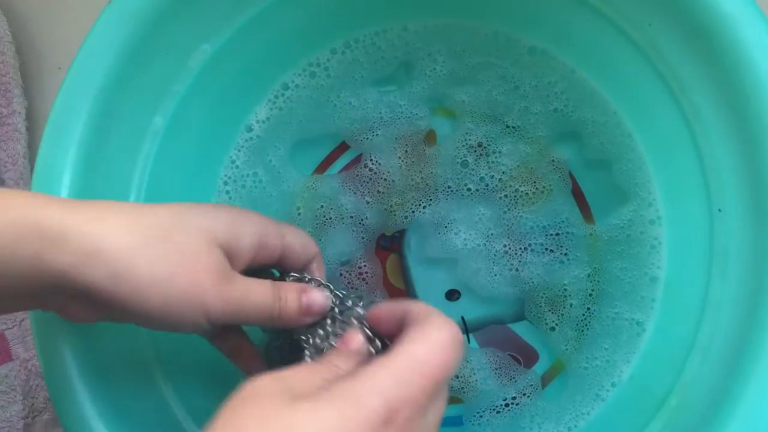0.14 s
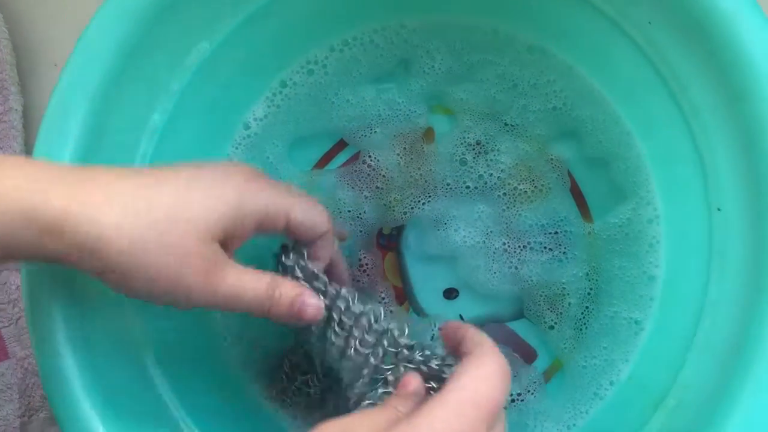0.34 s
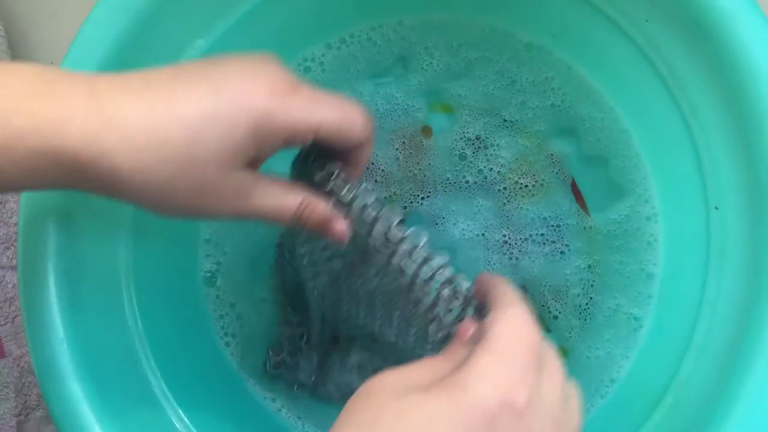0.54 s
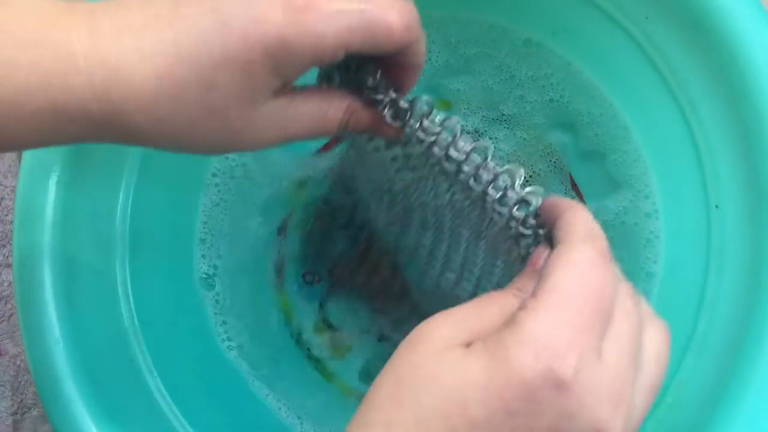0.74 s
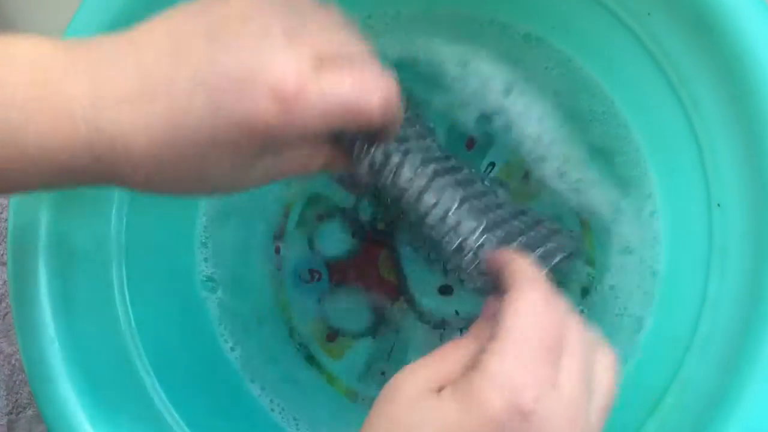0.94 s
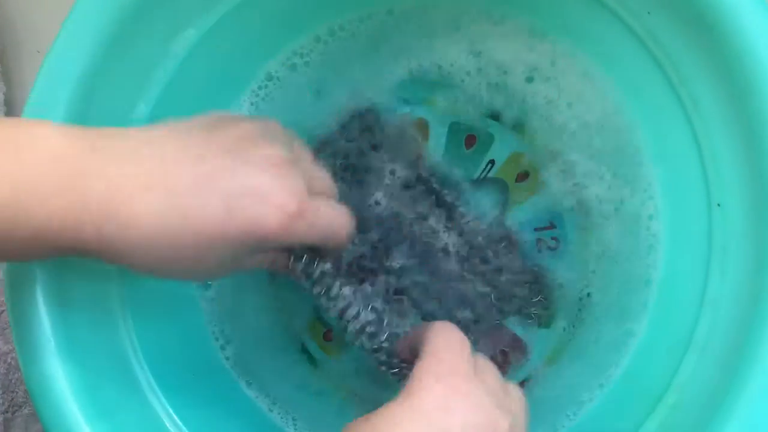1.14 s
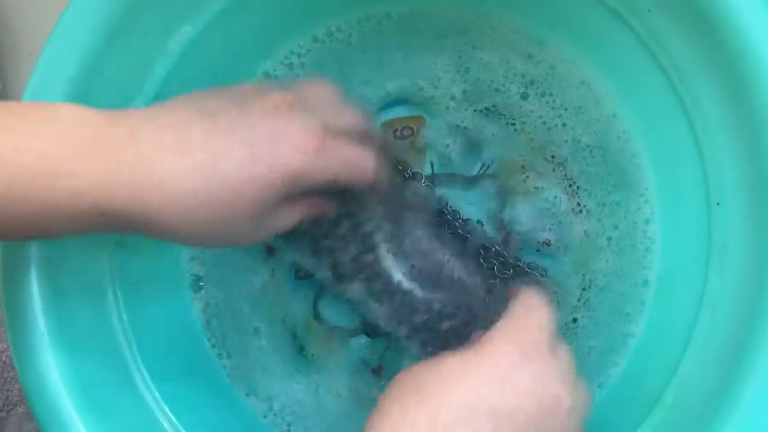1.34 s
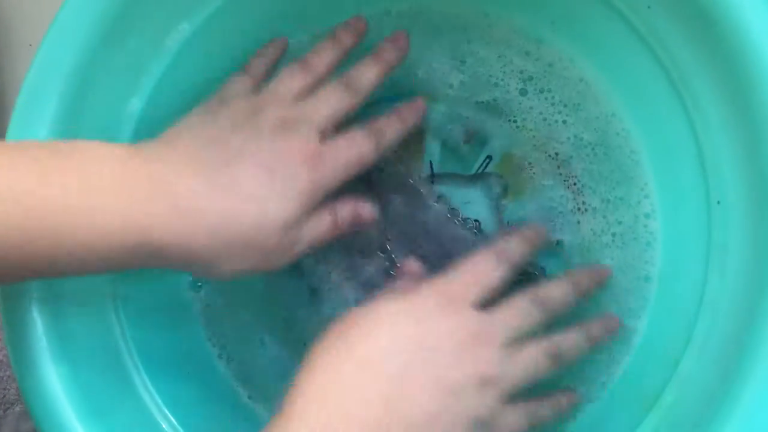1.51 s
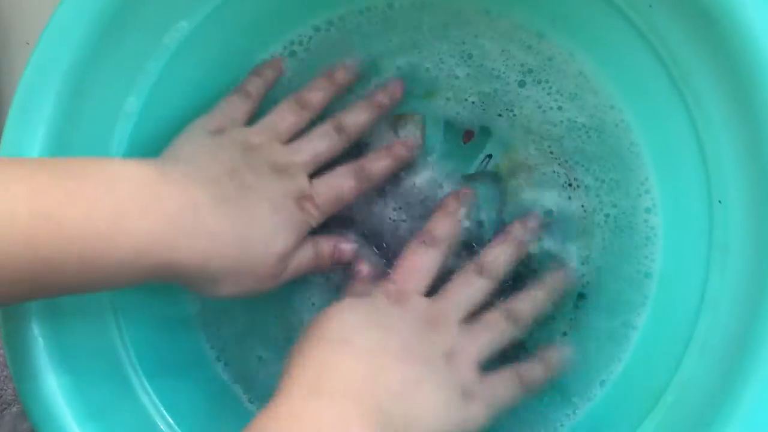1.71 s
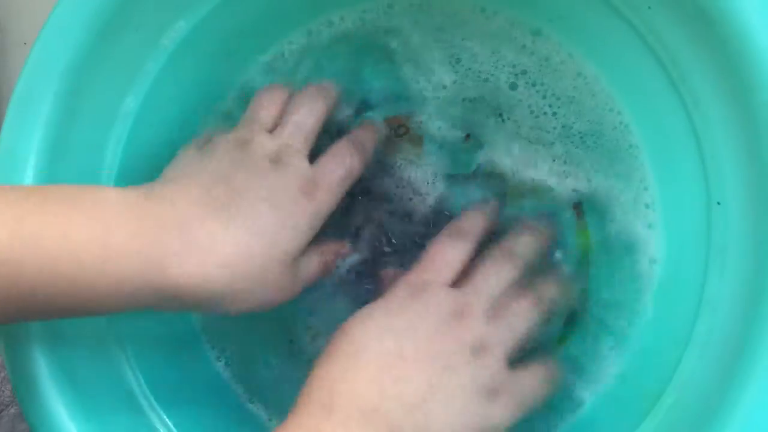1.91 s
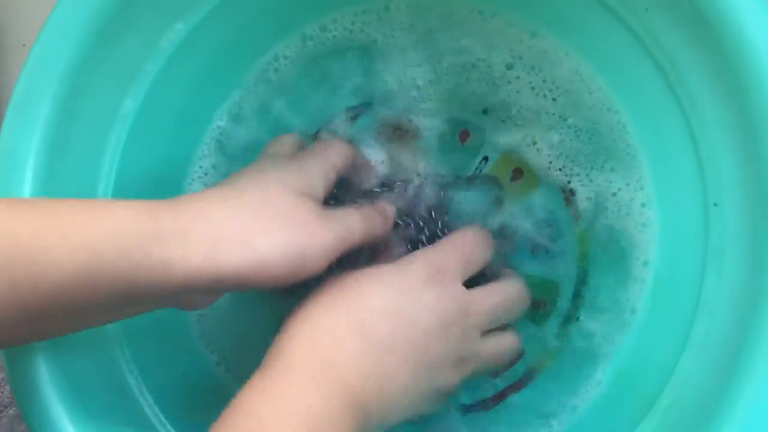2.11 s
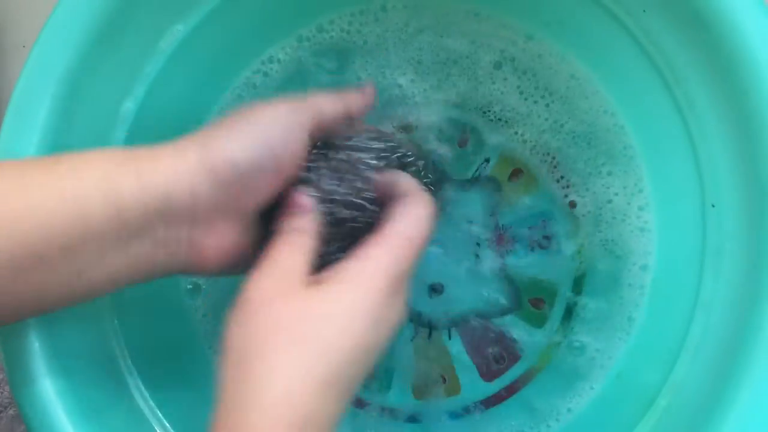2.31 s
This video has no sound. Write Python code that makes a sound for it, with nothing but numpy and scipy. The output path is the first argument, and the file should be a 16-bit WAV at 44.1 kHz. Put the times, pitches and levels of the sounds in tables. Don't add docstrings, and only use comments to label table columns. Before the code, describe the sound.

Steel chainmail handled in a plastic basin of soapy water, heard close in a small quiet room. Faint jingling, then a loud hollow clatter at 0.2 seconds with tiny bubble pops until about 0.35. Light ticking and dragging follow, with grating scrapes around 0.85-1.2. From 1.4 to 2.3, short scrubbing strokes crunch and tick over low watery thumps and gulps, with fine jingling near the end.

```python
import sys
import numpy as np
from scipy import signal
from scipy.io import wavfile
from scipy.ndimage import uniform_filter1d

SR = 44100
rng = np.random.default_rng(int(sys.argv[2]) if len(sys.argv) > 2 else 0)


def store_pcm(level_fs):
    pcm = np.round(np.clip(level_fs, -1, 1) * 32767).astype(np.int16)
    wavfile.write(sys.argv[1], SR, np.atleast_2d(pcm).T)


def nominal_scale(level):
    x = np.asarray(level, float) / 20
    return 10 ** x


N = 103635


def evened(x):
    return x / np.sqrt(np.mean(x ** 2) + 1e-20)


def read(points, hz):
    f, value = np.transpose(points)
    return np.interp(np.log(hz + 1), np.log(f + 1), value)


def curve(rows, column=1):
    rows = np.array(rows)
    return np.interp(np.arange(N) / SR, rows[:, 0], rows[:, column])


def add_at(out, time_s, x):
    i = round(time_s * SR)
    out[i:][:len(x)] += x[:N - i]


def highpass(x, order, hz):
    return signal.sosfilt(signal.butter(order, hz, "high", fs=SR, output="sos"), x)


def colour(x, points):
    log_gain = np.log(nominal_scale(read(points, abs(np.fft.fftfreq(4096, 1 / SR)))))
    fir = np.fft.ifft(np.exp(np.conj(signal.hilbert(log_gain)))).real[:2048]
    return signal.oaconvolve(x, fir / np.linalg.norm(fir))[:N]


def ring(x, modes, detune=0.):
    t = np.arange(6000) / SR
    response = np.zeros(len(t))
    for hz, width_hz, db in modes:
        mode_hz = hz * (1 + detune * rng.standard_normal())
        decay = nominal_scale(db) * np.sqrt(width_hz) * np.exp(-np.pi * width_hz * t)
        response += decay * np.sin(2 * np.pi * mode_hz * t) * rng.choice([-1, 1])
    return signal.oaconvolve(x, response / np.linalg.norm(response))[:N]


def taps(per_s, spread_db, clump_db):
    size = nominal_scale(spread_db * np.minimum(rng.exponential(1, N), 3.3))
    size = size * (rng.random(N) < per_s / SR)
    slow = uniform_filter1d(rng.standard_normal(N), size=130)
    clumps = evened(uniform_filter1d(slow, size=130))
    return evened(size * rng.choice([-1., 1.], N) * nominal_scale(clump_db * clumps))


def hush():
    # (frequency [Hz], density [dB per Hz])
    floor = [(40, -13), (100, -9), (250, -16), (600, -18.5), (1700, -22), (6000, -26), (16000, -55)]
    return nominal_scale(-70.5) * colour(rng.standard_normal(N), floor)


def thumps():
    # (time [s], level [dB])
    push = [(0, -73), (.1, -81), (.13, -78), (.17, -83), (.22, -62), (.25, -54), (.45, -72.5), (.96, -63.5),
            (1.3, -63.5), (1.44, -66), (1.48, -56), (1.62, -75), (1.73, -62), (1.79, -68), (1.85, -51.5),
            (2.0, -60), (2.1, -49.5), (2.35, -70)]
    # (frequency [Hz], width [Hz], level [dB])
    boom = [(71, 31, -3), (100.5, 9.4, 2.5), (127.5, 56, -1), (176, 16, -8.5), (209.5, 9.7, -7),
            (294, 27, -22)]
    bump_s, bump_length_s, bump_hz, bump_db = 0.088, 0.084, 72, -55.5
    lumps = nominal_scale(0.53 * evened(uniform_filter1d(rng.standard_normal(N), size=1500)))
    pressure = evened(rng.standard_normal(N) * lumps) * nominal_scale(curve(push))
    t = np.arange(N) / SR - bump_s
    swell = np.sin(np.pi * np.clip(t / bump_length_s, 0, 1)) ** 2
    bump = nominal_scale(bump_db) * swell * np.sin(2 * np.pi * bump_hz * t)
    return ring(pressure, boom) + bump


def jingle():
    # (time [s], level [dB])
    loose = [(0, -81), (.05, -68), (.11, -64.5), (.13, -56.5), (.21, -56.5), (.3, -87), (1.2, -79),
             (1.33, -98), (1.46, -55), (1.6, -86), (1.85, -62), (2.2, -49.5), (2.35, -54)]
    # (frequency [Hz], width [Hz], level [dB])
    ring_modes = [(11260, 280, 5.5), (11700, 310, 1.5), (5250, 330, -2), (6170, 220, 0), (3580, 600, -7)]
    # (frequency [Hz], density [dB per Hz])
    hiss = [(600, -32), (2000, -6.5), (5000, -4.5), (8500, -5), (10300, -6), (12000, -2.5), (16000, -5)]
    wet_db, wet_from_s, hiss_db = -10, 1, 4
    level = nominal_scale(curve(loose))
    touches = taps(2500, 3, 2.5) * level
    wet = nominal_scale(wet_db * (np.arange(N) > wet_from_s * SR))
    return ring(touches * wet, ring_modes) + nominal_scale(hiss_db) * colour(taps(7700, 2.5, 1.4) * level, hiss)


def bubbles():
    # (time [s], peak [dB], pitch [Hz], t60 [s])
    pops = [
        (0.203, -40, 5200, 0.015),
        (0.271, -14, 5250, 0.012),
        (0.35, -26, 4450, 0.011),
        (0.34, -19.5, 4450, 0.0081),
        (.737, -33, 6800, 0.017),
        (0.657, -35, 6100, 0.028),
        (.192, -46, 6550, 0.0071),
    ]
    swell_s = 0.0048
    out, t = np.zeros(N), np.arange(2000) / SR
    for time_s, db, hz, t60_s in pops:
        swell = np.sin(np.pi / 2 * np.minimum(t / swell_s, 1)) ** 2
        pop = swell * nominal_scale(db + 9.0 - 60 * (t / t60_s) ** 0.97)
        add_at(out, time_s, pop * np.sin(2 * np.pi * hz * (t + 1.2 * t ** 2)))
    return out


def contact():
    # (time [s], level [dB], brightness [dB])
    drag = [(.21, -93, 0), (.3, -39.5, -2), (.43, -48, 0.5), (.59, -42.5, 1), (.8, -35.5, 0),
            (.91, -39.5, -2), (1.1, -41, -1), (1.285, -40.5, -5), (1.308, -45, -30), (1.345, -48.5, -26),
            (1.4, -50, 9), (1.5, -50.5, 14.5), (1.6, -71, -5), (1.75, -52, 5), (1.9, -40.5, -29),
            (2.02, -39, 3), (2.21, -34, -3.5), (2.35, -42, 17)]
    # (start [s], length [s], level [dB], peak place [0-1], brightness [dB])
    strokes = [(0.216, 0.0052, -24.5, 0.73, 0), (0.223, 0.046, -22, 0.46, 6.5), (0.261, 0.046, -31, 0, 6.5),
               (0.289, 0.045, -36, 0.1, 3.5), (0.833, 0.021, -28.5, 0.46, -1.5),
               (.855, 0.012, -49, 0.2, 10), (0.9, 0.16, -35.5, 0.5, 2.5), (0.965, 0.11, -28.5, 0.57, 3),
               (1.154, 0.036, -33, 0.38, 1.5), (1.208, 0.064, -41.5, 0.2, 0.5),
               (1.385, 0.025, -38, 0.42, 5.5), (1.4, 0.056, -37, 0.86, 4.5), (1.453, 0.048, -27, 0.46, 5),
               (1.678, 0.06, -29.5, 0.62, 0), (1.802, 0.068, -42, 0.31, 4), (1.826, 0.068, -29, 0.64, 3.5),
               (1.922, 0.067, -37, 0.31, 4), (2.032, 0.081, -31.5, 0.33, -0.5),
               (2.097, 0.081, -27.5, 0.8, 1)]
    rise_db, fall_db, edge_s = -10, -10, 0.005
    start_share = 0.37
    t = np.arange(N) / SR
    parts = [(nominal_scale(curve(drag)), curve(drag, column=2))]
    for start, length, db, peak, bright_db in strokes:
        top, end = start + length * np.clip(peak, .05, .95), start + length
        closed = start + start_share * (top - start)
        gate = np.interp(t, [start, closed, end, end + edge_s], [0, 1, 1, 0])
        swell_db = np.interp(t, [start, top, end], [rise_db * peak, 0, fall_db * (1 - peak)])
        parts.append((gate * nominal_scale(db + swell_db), bright_db))
    level = np.sqrt(sum(g ** 2 for g, _ in parts))
    bright = np.sqrt(sum((g * nominal_scale(b)) ** 2 for g, b in parts))
    return level, bright


def knocks():
    # (time [s], peak [dB], brightness [dB])
    hits = [(0.2164, -23, 12.5), (0.228, -12, -6), (0.236, -6.5, -10), (0.243, -7, 3.5), (0.367, -35, -1),
            (0.389, -32, 3.5), (0.445, -30.5, 5), (0.464, -26.5, -10), (0.499, -25.5, 3.5), (0.748, -25, 5),
            (0.822, -31, 6), (0.841, -23, 3), (0.858, -26, 14.5), (0.973, -21.5, 9), (1.034, -18, -10),
            (1.351, -34.5, 6.5), (1.367, -34.5, 13), (1.39, -28, 5), (1.421, -32, -3), (1.695, -22.5, -5),
            (1.874, -20, -4), (1.959, -23.5, -5), (2.04, -31, -8), (2.111, -16, -1), (2.287, -35, 17)]
    knock_s, knock_db = 0.0017, -8
    body, bright, u = np.zeros(N), np.zeros(N), np.arange(600) / SR / knock_s
    swell = 1.72 * u ** 0.33 * np.exp(-u / 1.47)
    for time_s, db, bright_db in hits:
        shape = nominal_scale(db + knock_db) * swell * rng.standard_normal((2, 600))
        add_at(body, time_s, shape[0])
        add_at(bright, time_s, nominal_scale(bright_db) * shape[1])
    return body, bright


def mail():
    # (frequency [Hz], width [Hz], level [dB])
    basin = [(360.8, 14, -12.5), (751, 60, -4.5), (874, 38, -5), (1216, 25, -5.5), (1425, 100, -4.5),
             (1601, 24, -1.5), (1717, 34, 3), (1967, 56, 0.5), (2110, 47, -1), (2242, 73, -3.5),
             (3220, 36, -6.5), (3460, 570, 2.5)]
    # (frequency [Hz], width [Hz], level [dB])
    hollow = [(1242, 160, -11.5), (1692, 164, 3.5), (2070, 160, -1.5), (3360, 280, -16)]
    # (time [s], level [dB])
    dry_wall = [(0, 10), (.3, -6), (1.1, -4), (1.3, -27), (2.35, -21)]
    # (frequency [Hz], density [dB per Hz])
    tap_body = [(150, -74.5), (330, -23.5), (750, -5.5), (1100, -6), (1800, -3.5), (2600, -9),
                (6000, -22.5), (16000, -49)]
    # (frequency [Hz], level [dB])
    tick = [(800, -24), (2500, 1.5), (4000, 3.5), (6200, 1), (7200, -4), (10300, -7.5), (11000, -6),
            (16000, -13)]
    modes_db, hollow_db, tick_db, wall_low_hz = -2, -1, -9.5, 330
    own_ticks = 0.76
    level, bright = contact()
    knock, knock_bright = knocks()
    clicks = taps(8000, 3, 2)
    ticks = evened(clicks * (1 - own_ticks) + own_ticks * taps(4000, 3.5, 1.7))
    drive = clicks * level + .4 * knock
    patch = rng.integers(0, 6, N)
    walls = nominal_scale(modes_db) * sum(ring(drive * (patch == k), basin, detune=.004) for k in range(3))
    hollow_drive = knock + nominal_scale(curve(dry_wall)) * level * taps(3000, 5.8, 3.0)
    walls = highpass(walls + nominal_scale(hollow_db) * ring(hollow_drive, hollow), 4, wall_low_hz)
    steel = nominal_scale(tick_db) * colour(ticks * bright + knock_bright, tick)
    return colour(drive * (patch > 2), tap_body) + walls + steel


def slaps():
    # (time [s], peak [dB])
    blows = [(0.2165, -19), (.2273, -16), (0.2354, -3.5), (0.2397, -8), (0.2429, -6.5), (.247, -10),
             (1.012, -17), (1.4212, -24), (1.7041, -21), (1.712, -20.5), (1.7196, -20)]
    # (frequency [Hz], width [Hz], level [dB])
    slap_modes = [(1696, 120, -2.5), (2030, 220, 1.5), (3500, 760, 1), (1220, 150, -11)]
    slap_db, slap_low_hz = -3.5, 800
    drive = np.zeros(N)
    for time_s, db in blows:
        add_at(drive, time_s, nominal_scale(db + slap_db) * np.hanning(13))
    return highpass(ring(drive, slap_modes), 3, slap_low_hz)


def gulps():
    # (time [s], peak [dB], pitch [Hz], length [s])
    swells = [(.235, -46, 139, 0.06), (.29, -49, 150, 0.052), (.575, -60, 94, 0.055),
              (.64, -57.5, 100, 0.06), (0.953, -52, 110, 0.071), (1.16, -54.5, 177, 0.056),
              (1.464, -46, 140, 0.045), (1.47, -49, 92, .06), (1.702, -54, 105, 0.046),
              (1.71, -50.5, 175, .06), (1.847, -47, 95, 0.082), (1.86, -51, 179, .04),
              (1.905, -50, 95, .05), (1.959, -50, 100, .045), (2.034, -44, 96.5, 0.068),
              (2.095, -45, 208, .04), (2.099, -45, 126, .04), (2.152, -47, 149, 0.036),
              (2.165, -47, 202, .04), (2.203, -55, 116, 0.079)]
    out = np.zeros(N)
    for time_s, db, hz, length_s in swells:
        t = np.arange(0, length_s, 1 / SR)
        swell = np.sin(np.pi * (t / length_s) ** 0.76) ** 2
        add_at(out, time_s, nominal_scale(db) * swell * np.sin(2 * np.pi * (hz * t + rng.random())))
    return out


def snaps():
    # (time [s], peak [dB], dullness [0-1])
    clicks = [(.4889, -41, 0.4), (.5487, -32, .5), (.659, -34, .2), (.672, -43, .3), (.715, -42, .3),
              (.7378, -38, .6), (.7912, -29, 0), (.815, -40, .1), (.8251, -31, 0.5), (.868, -35, .1),
              (.9209, -34, .2), (.943, -35, .3), (1.04, -26, .2), (1.063, -33, 0.3), (1.112, -46, .1),
              (1.2142, -30, 1), (1.266, -43, .1), (1.279, -43, .2), (1.378, -41, .7), (1.396, -40, .4),
              (1.4427, -37, 0.2), (1.451, -36, .1), (1.4631, -26, 0.6), (1.496, -25, .2), (1.8079, -41, .2),
              (1.8308, -31, 0.2), (1.9316, -40, .5), (1.9875, -31, .05), (2.174, -27, 0.1),
              (2.205, -35, .3), (2.34, -30, .2)]
    # (frequency [Hz], level [dB])
    thin_colour = [(3000, -30), (6500, -5), (9000, 3), (11000, -8), (16000, -3)]
    # (frequency [Hz], level [dB])
    dull_colour = [(800, -27), (2500, -2), (6300, -2), (8000, -8), (16000, -20)]
    snap_s, snap_db = 0.0016, -5
    thin, dull, u = np.zeros(N), np.zeros(N), np.arange(600) / SR / snap_s
    for time_s, db, dullness in clicks:
        burst = nominal_scale(db + snap_db) * np.minimum(u * 8, 1) * np.exp(-u) * rng.standard_normal(600)
        add_at(thin, time_s, (1 - dullness) * burst)
        add_at(dull, time_s, dullness * burst)
    return colour(thin, thin_colour) + colour(dull, dull_colour)


def tail():
    # (frequency [Hz], t60 [s])
    decay = [(250, 0.5), (1000, 0.3), (3000, 0.27), (8000, 0.23), (15000, 0.08)]
    spots = np.zeros(SR // 2)
    at = np.arange(200, SR // 2 - 20, 20)
    spots[at + rng.integers(0, 20, len(at))] = rng.choice([-1., 1.], len(at))
    hz, t, z = signal.stft(spots, SR, nperseg=256)
    echoes = signal.istft(z * nominal_scale(-60 * t / read(decay, hz)[:, None]), SR, nperseg=256)[1]
    return echoes / np.linalg.norm(echoes)


def room(x):
    turn = np.pi * 9 * np.arange(N) / SR
    out = np.zeros(N)
    for k in range(3):
        share = np.sqrt(2 / 3) * np.cos(turn + k * np.pi / 3)
        out += signal.fftconvolve(x * share, tail())[:N]
    return out


def scene():
    room_db = -12
    low = thumps() + gulps()
    near = jingle() + mail() + slaps() + snaps()
    pops = bubbles()
    answer = nominal_scale(room_db) * room(near + 0.56 * pops)
    return (hush() + low + near + pops + answer)[None]


def low_pass(x):
    return signal.sosfilt(signal.butter(12, 17010, fs=SR, output="sos"), x)


def record(dry):
    low_hz, edge_hz = 70, 15800
    mic = highpass(dry, 3, low_hz)
    band = signal.firwin(2047, edge_hz, window=("kaiser", 7), fs=SR)
    mic = signal.oaconvolve(mic, band[None], "same")
    return low_pass(mic)


dry = scene()
out = record(dry)
store_pcm(out)
```